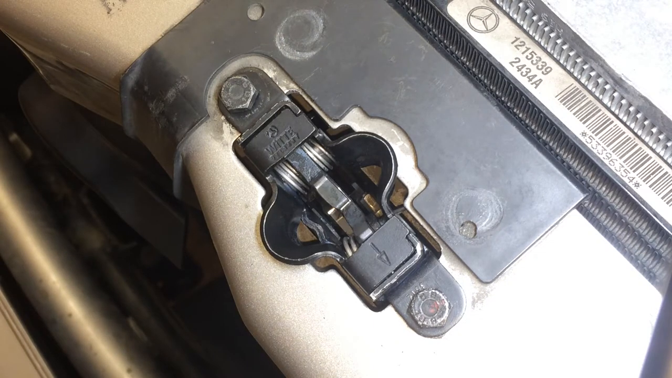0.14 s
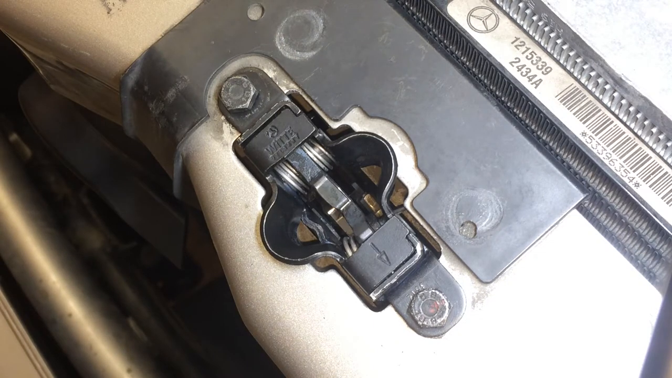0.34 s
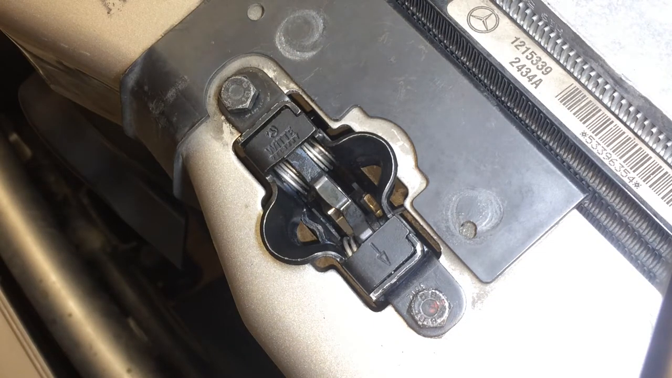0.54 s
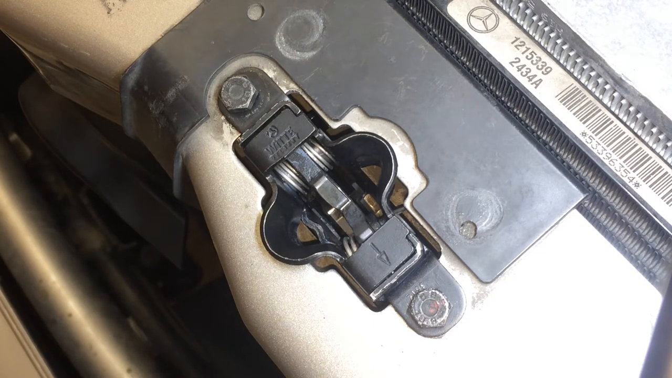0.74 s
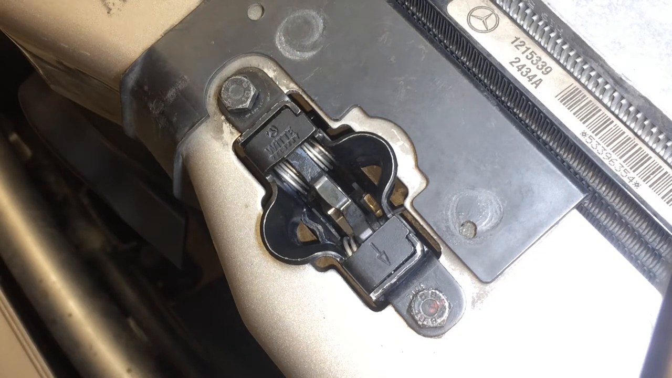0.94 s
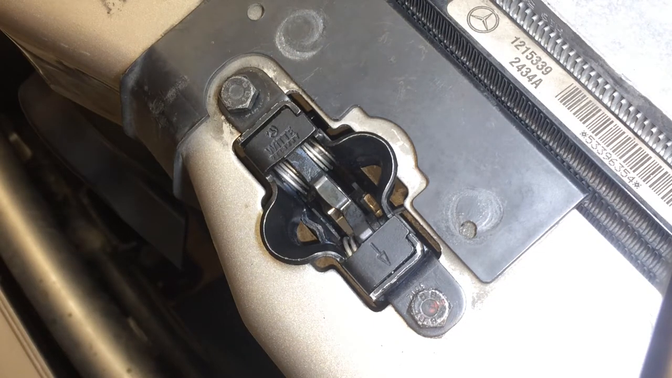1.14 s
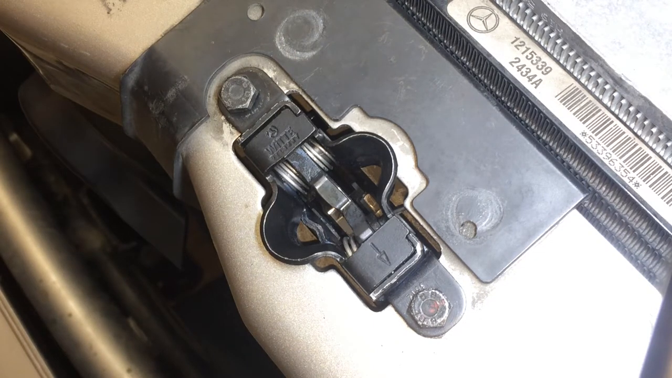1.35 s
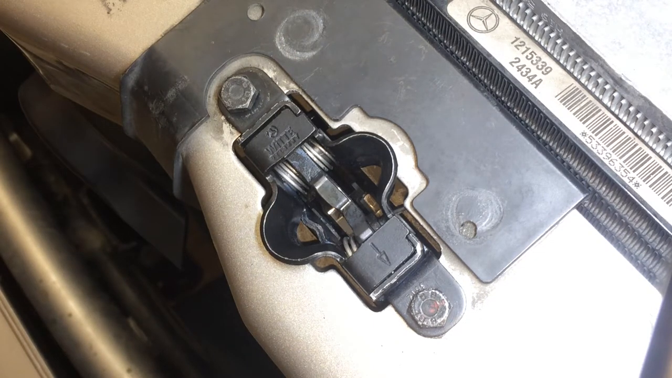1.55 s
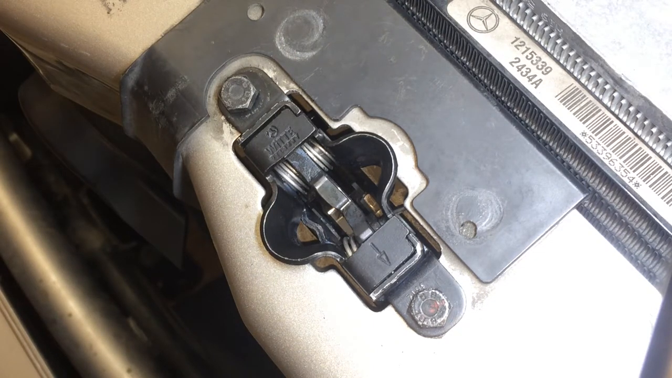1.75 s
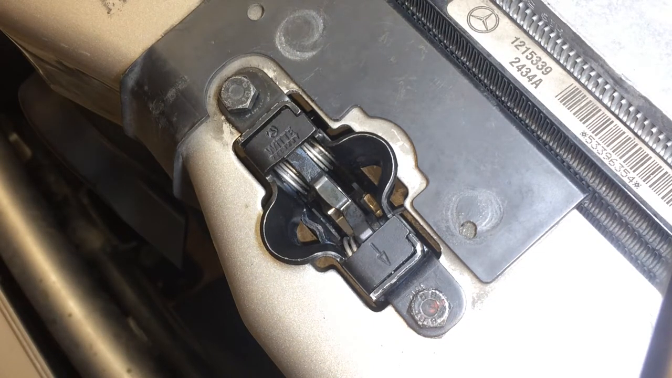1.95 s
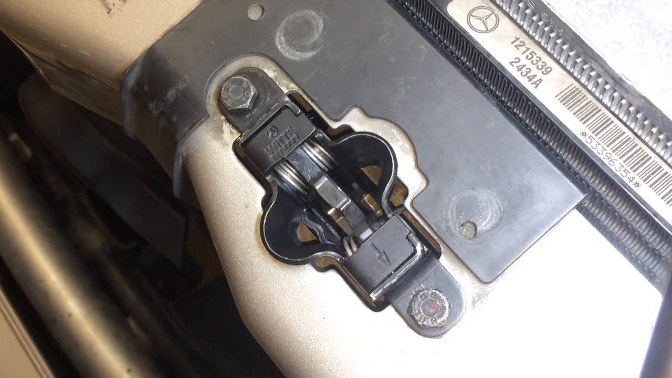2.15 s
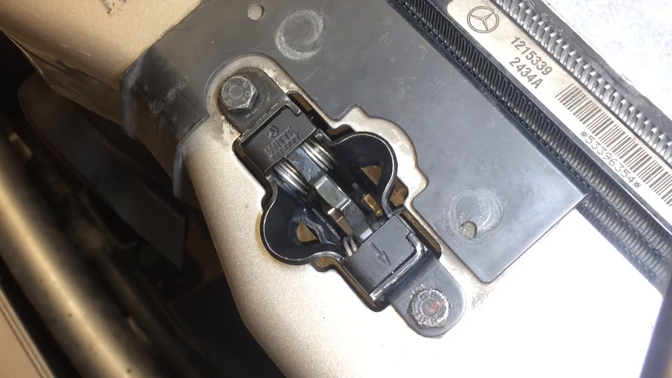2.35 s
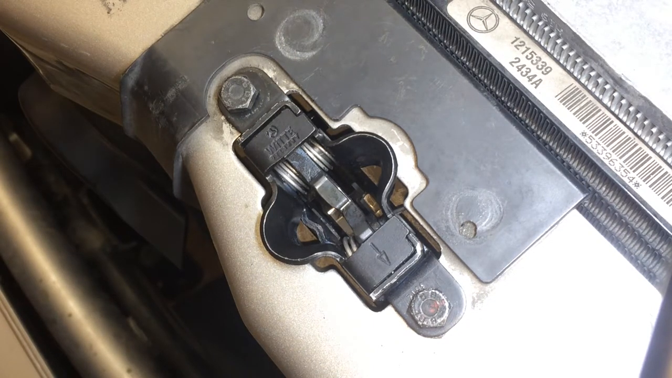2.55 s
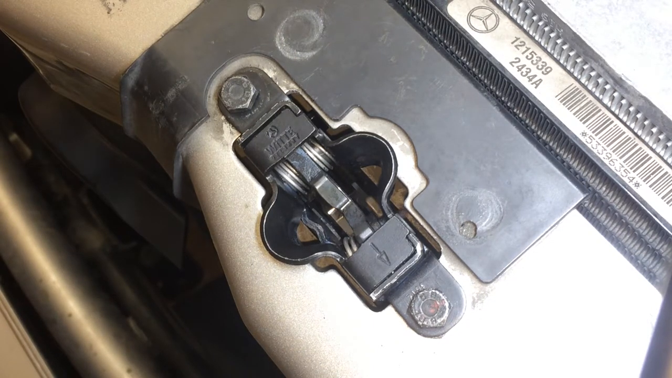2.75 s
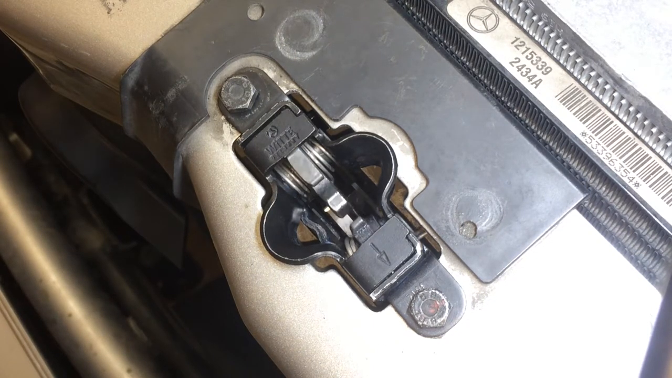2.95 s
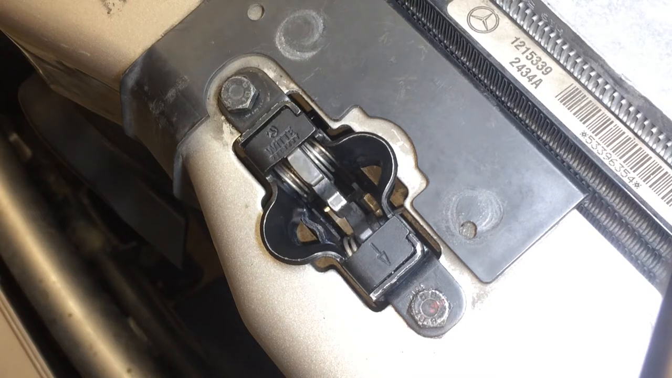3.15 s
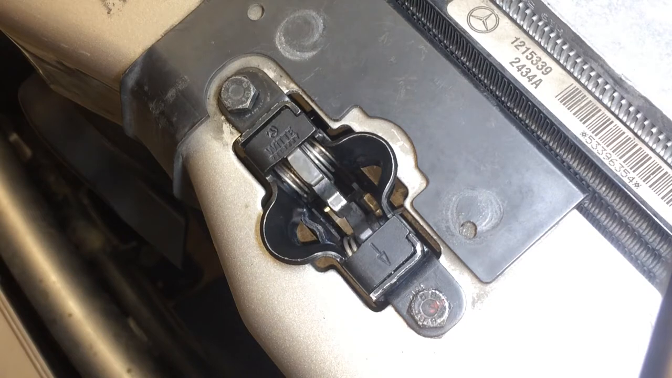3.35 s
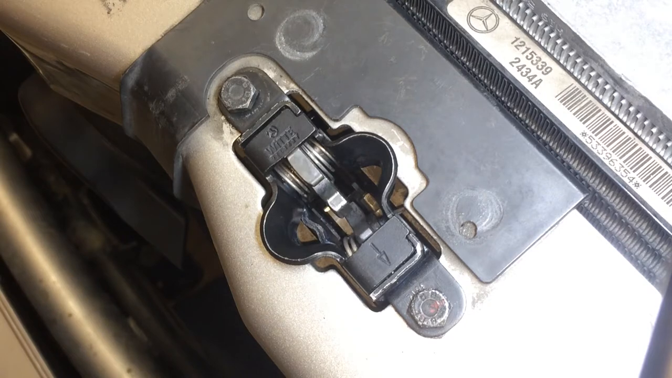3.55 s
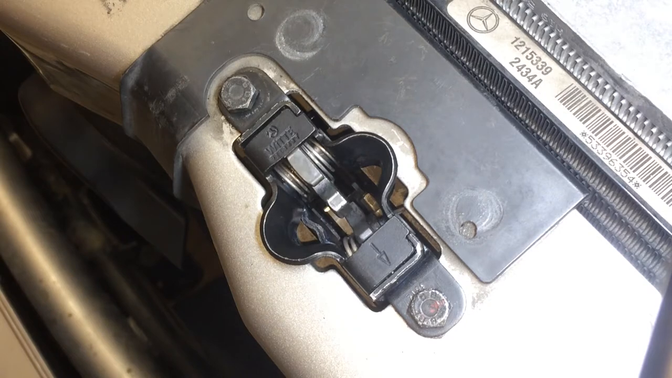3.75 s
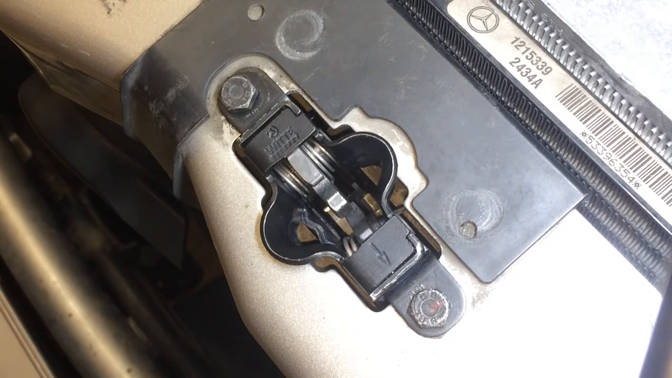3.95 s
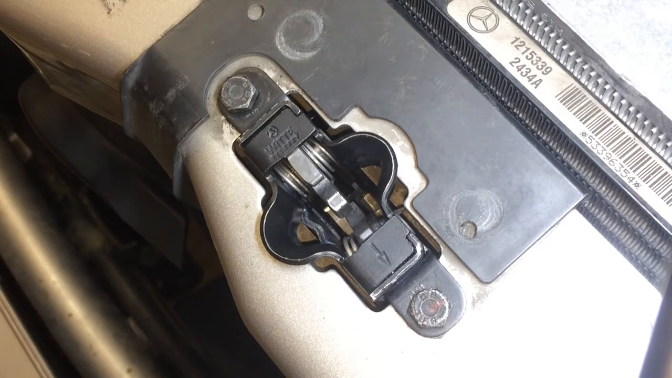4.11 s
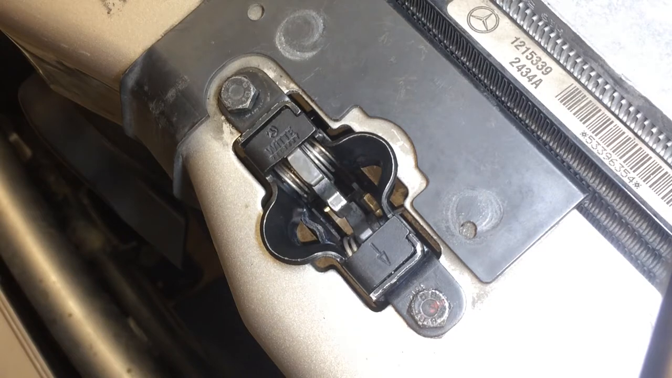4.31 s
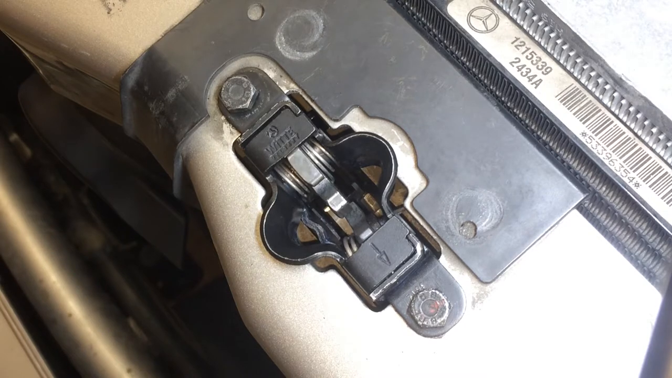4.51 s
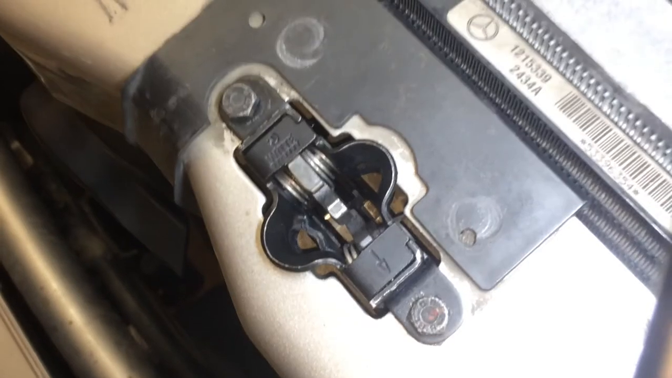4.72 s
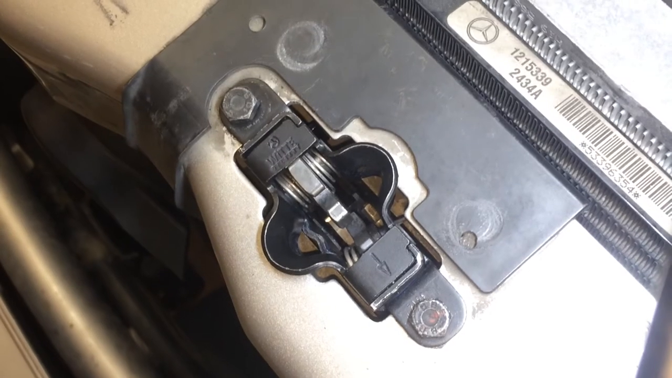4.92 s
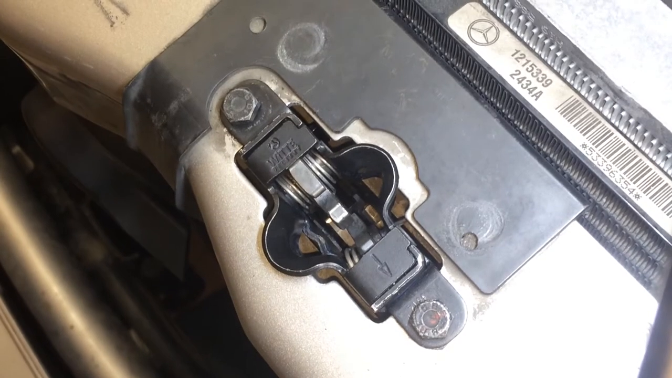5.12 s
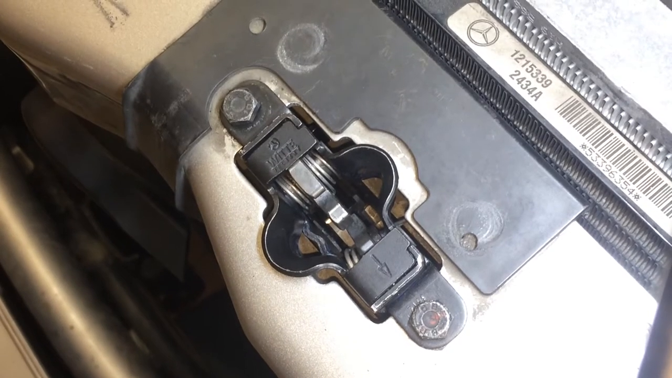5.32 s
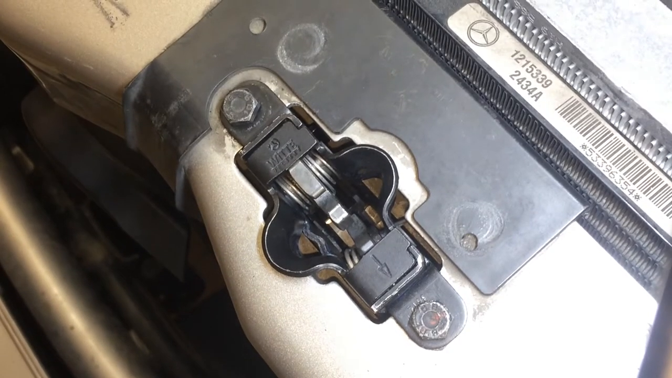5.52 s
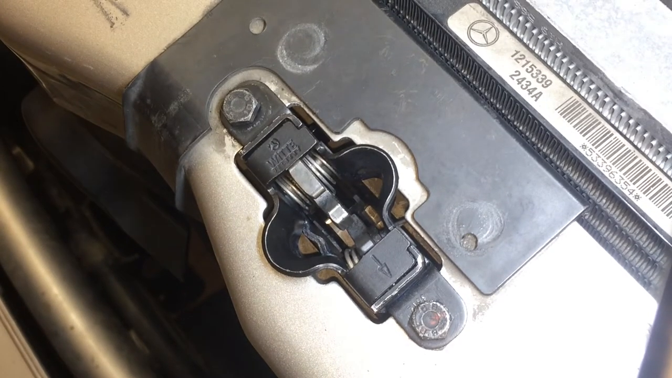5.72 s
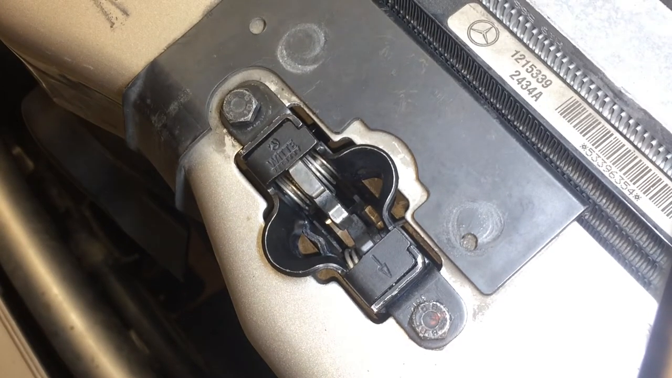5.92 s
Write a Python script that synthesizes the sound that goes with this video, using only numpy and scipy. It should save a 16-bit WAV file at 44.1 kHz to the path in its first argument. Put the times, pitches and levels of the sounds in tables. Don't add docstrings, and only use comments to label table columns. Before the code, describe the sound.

In a hard-walled garage, a low compressor hum runs faintly. Someone scuffs and bumps the car body, with a cluster of hollow knocks around one second. Near three seconds a steel latch snaps free very close, loud and ringing, then clacks back. Later a door shuts with a boomy double thud, loose trim rattles, and a few faint knocks follow. Close phone microphone, echo after every blow.

```python
import sys
import numpy as np
from scipy import signal
from scipy.fft import rfft, irfft, next_fast_len
from scipy.io import wavfile
from scipy.ndimage import uniform_filter1d, map_coordinates

SR = 44100
rng = np.random.default_rng(int(sys.argv[2]) if len(sys.argv) > 2 else 0)


def elevation(decibels):
    levels = np.asarray(decibels, float)
    return 10 ** (levels / 20)


def output_pcm(signal):
    pcm = np.clip(np.atleast_2d(signal).T, -1, 1) * 32767
    wavfile.write(sys.argv[1], SR, np.round(pcm).astype(np.int16))


N = 267775
SPAN = SR

# f/Hz, fall by 60 dB/s
WALLS = [(40, 0.91), (150, 0.43), (400, 0.35), (1500, 0.4), (4000, 0.38), (12000, .27)]
# f/Hz, level/dB, wander/Hz
HUM = [(60.2, -67, 1.3), (118.6, -68, 2.2), (204, -76.5, 5), (405, -78.5, 2.4), (722, -84, 7.1),
       (876, -76, 0.45), (1724, -86, 3)]
# f/Hz, level per Hz/dB
AIR = [(15, -36), (25, -12), (120, -2), (166, -5.5), (317, -10.5), (405, -10.5), (591, -17.5), (796, -18.5),
       (863, -15), (988, -22), (1740, -18.5), (2760, -28), (12900, -33.5), (14800, -37.5), (16000, -48)]
# t/s, clatter level/dB, hardness/dB per octave, boom over clatter/dB, contact/s
BUMPS = [(.208, -57, -2, 14.5, 0.028), (.84, -55.5, -2.5, 6.5, 0.064), (.88, -54, -3.5, 8.5, 0.068),
         (.915, -52.5, -7, 9.5, 0.048), (.947, -37.5, -2, 13, 0.038), (1.311, -29.5, -5, 3, 0.024),
         (1.345, -42.5, -6, 14.5, 0.024), (1.438, -61.5, 3, 15, 0.026), (1.52, -51.5, -11, -8, 0.042),
         (1.76, -61.5, -1.5, 9.5, 0.028), (1.92, -62, 21, 9.5, 0.022), (2.398, -54.5, -9, -7, .05),
         (3.718, -59, -4.5, -2, 0.05), (4.40, -56, -12, 0, 0.06), (5.601, -46, -7, -10, 0.024),
         (5.655, -58, -16, -17, .0097), (5.797, -58, -2.5, -3, 0.015)]
# f/Hz, width/Hz, level/dB
PANEL = [(55, 19.9, -13), (89, 23, -9.5), (130, 38, -2.5), (209, 18, -4), (311.2, 58, -8)]
# f/Hz, level per Hz/dB
BODY = [(150, -20), (300, 3), (800, 1.5), (1500, 0.5), (3000, -4.5), (5000, -5.5), (7000, -9),
        (9000, -13.5), (15000, -12.5)]
# t/s, level/dB, f/Hz, contact/s
BRACKETS = [(.842, -62, 4300, .004), (.876, -64, 3960, .006), (.954, -46, 5070, 0.023),
            (.948, -34, 129, 0.038), (.952, -38, 343, 0.044), (1.033, -39.5, 1300, 0.009),
            (1.315, -33, 304, 0.021), (1.34, -39.5, 212, 0.056), (1.076, -52.5, 1590, .02),
            (1.313, -32.5, 773, .025), (2.84, -58, 2100, .014), (2.87, -37, 2500, .025),
            (2.914, -41.5, 149.8, .03), (4.525, -55, 300, .06), (4.63, -33, 6300, .038),
            (4.632, -30, 3480, .03), (4.685, -26, 130, 0.028), (4.9, -49, 185, .25)]
# t/s, level/dB, f/Hz, contact/s
HANDLES = [
    (.209, -53, 260, 0.023),
    (.95, -40, 510, 0.1),
    (1.44, -53, 2520, 0.012),
    (2.899, -23, 3300, 0.09),
    (3.721, -49, 179, 0.018),
    (4.633, -23.5, 527, 0.039),
    (5.664, -64.5, 3180, .04),
]
# t/s, level/dB, f/Hz, contact/s
COVERS = [
    (.225, -68.5, 4960, 0.096),
    (2.395, -48, 950, .045),
    (3.127, -23, 1044, 0.016),
    (5.602, -45, 900, 0.023),
]
# t/s, level/dB, brightness/dB per octave, stroke/s
SCUFFS = [(0.3094, -60, 0.5, 0.05), (0.3975, -58, -1.5, 0.019), (0.5989, -59, -2, 0.043),
          (0.6498, -68.5, -1, 0.034), (1.246, -51.5, -5, 0.052), (1.7096, -61.5, -1, 0.056),
          (1.9235, -52.5, 2.5, 0.017), (2.076, -55.5, 1.5, 0.056), (4.4992, -66.5, 6.5, 0.054),
          (5.5102, -61.5, -0.5, 0.05), (5.6497, -59.5, 3, 0.028), (5.6794, -64.5, 12, 0.05)]
# f/Hz, level per Hz/dB
SCRAPE = [(300, -10.5), (700, -0.5), (2000, -1), (3000, -2.5), (4500, -5.5), (7000, -7.5), (9000, -11),
          (15000, -18)]
# f/Hz, width/Hz, level/dB
TOOL = [(1700, 60, -3), (2380, 60, -2), (2820, 50, 0.5), (3760, 60, -3), (5830, 52, -4), (6853, 70, -2),
        (7500, 80, -6), (8882, 80, -12)]
# t/s, level/dB, ring over level/dB, crack/s, wall answer/dB
LATCH = [
    (2.839, -59.5, -10.5, 0.0078, 5.5),
    (2.8641, -39.5, -13, 0.0025, 0),
    (2.886, -7, -5, 0.00092, -2),
    (2.899, -12.5, 1.5, 0.0057, -15),
    (3.115, -39.5, -17, 0.0019, -6),
    (3.1209, -13, -8, 0.0022, -16.5),
    (3.125, -19.5, -31, 0.0019, -7),
]
# f/Hz, level/dB, fall by 60 dB/s
STEEL = [(665, -7.5, 0.14), (1373, -8, .1), (1588, -5.5, .12), (1750, -4, 0.08), (1908, -3.5, 0.18),
         (2430, 3, 0.1), (2820, -6, .1), (3364, -4, .12), (3537, -6.5, .12), (3730, -5, .09),
         (4070, -8, 0.086), (5820, -8.5, 0.024), (6780, -10.5, 0.078)]
# f/Hz, level per Hz/dB
CRACK = [(150, -41), (350, -12.5), (650, -7), (1100, -12), (1600, -3.5), (2300, -2.5), (3700, -5.5),
         (6000, -7.5), (8500, -12.5), (14500, -15), (16000, -23.5)]
# t/s, level/dB, width/s
SHOVE = [
    (2.879, -14.5, 0.0031),
    (2.89, -27.5, 0.0082),
]
# t/s, clatter level/dB, hardness/dB per octave, boom over clatter/dB, contact/s
DOOR = [
    (4.603, -33.5, -6, -0.5, 0.053),
    (4.62, -20, -1, 4.5, .035),
    (4.643, -22, -2.5, 5, .025),
    (4.685, -36.5, -3, 15.5, 0.039),
    (4.705, -32.5, -9, 3, 0.019),
    (4.719, -36, 4.5, -5, .003),
    (4.8, -55, -3, 12, 0.36),
]
# f/Hz, width/Hz, level/dB
CABIN = [(49.6, 23, -7), (79, 15, -8), (121.7, 23, -1.5), (189, 73, -9), (300, 49, -10)]
# t/s, level/dB
TRIM = [
    (4.88, -45.5),
    (4.94, -45),
    (4.995, -48.5),
    (5.015, -54),
    (5.055, -52.5),
    (5.105, -55.5),
    (5.18, -67),
]
# f/Hz, width/Hz, level/dB
TRIM_MODES = [(900, 155, 6.5), (1540, 136, -3), (1888, 160, 0)]
# t/s, depth/dB
DUCKS = [
    (2.886, -9.5),
    (4.622, -4),
]


def unit(x):
    return x / np.sqrt(np.mean(x ** 2) + 1e-20)


def loudest(x):
    return x / np.sqrt(np.abs(uniform_filter1d(x ** 2, SR // 100)).max() + 1e-20)


def along(points, hz):
    f, v = np.transpose(points)
    return np.interp(np.log(hz + 1), np.log(f + 1), v)


def wobble(rate, size):
    knots = rng.standard_normal(int(size * rate / SR) + 4)
    return map_coordinates(knots, [np.arange(size) * rate / SR])


def filtered(x, response):
    m = next_fast_len(len(x) + SR // 4)
    return irfft(rfft(x, m) * response(np.fft.rfftfreq(m, 1 / SR)), m)[:len(x)]


def resonances(modes):
    def response(f):
        total = 0
        for k, (hz, width, db) in enumerate(modes):
            total = total + (-1) ** k * elevation(db) * 1j * f * width / (hz * hz - f * f + 1j * f * width)
        return total
    return response


def sloped(points, tilt_db):
    return lambda f: elevation(along(points, f) + tilt_db * np.log2((f + 50) / 3000))


def add(out, s, x):
    out[round(s * SR):][:len(x)] += x


def contact(length, lumps_db):
    u = np.arange(SPAN) / SR / max(length, .001)
    lumps = elevation(lumps_db * wobble(253, size=SPAN))
    return u * np.exp(-u) * lumps * rng.standard_normal(SPAN)


def tail(delay=0.005):
    hz, t, z = signal.stft(rng.standard_normal(SPAN), SR, nperseg=512)
    fade = elevation(-60 * t / along(WALLS, hz)[:, None])
    x = signal.istft(z * fade, SR, nperseg=512)[1][:SPAN]
    x = x * (1 - np.exp(-np.arange(SPAN) / SR / delay))
    return x / np.linalg.norm(x)


def heard(length, lumps_db, wet_db):
    force = contact(length / 3, lumps_db)
    return force + elevation(wet_db) * np.linalg.norm(force) * tail(delay=0.001 + 0.25 * length)


def body_blows(table, panel, wet_db):
    def boom_response(f):
        return resonances(panel)(f) / (1 + 1j * f / 350)

    out = np.zeros(N + SPAN)
    for s, db, tilt_db, boom_db, length in table:
        force = heard(length, lumps_db=3.5, wet_db=wet_db)
        push = heard(length, lumps_db=2.0, wet_db=wet_db - 3.5)
        push[round(.2 * length * SR)] += 0.63 * np.linalg.norm(push)
        boom = loudest(filtered(push, boom_response))
        clatter = loudest(filtered(force, sloped(BODY, tilt_db)))
        add(out, s, elevation(db) * (elevation(boom_db) * boom + clatter))
    return out[:N]


def garage():
    z = signal.stft(rng.standard_normal(N + 512), nperseg=512)[2]
    patches = uniform_filter1d(uniform_filter1d(rng.standard_normal(z.shape), 6, 0), 10, 1)
    noise = signal.istft(z * elevation(0.93 * unit(patches)), nperseg=512)[1][:N]
    out = elevation(-65.5) * unit(filtered(noise, lambda f: elevation(along(AIR, f))))
    for hz, db, wander in HUM:
        level_db = db + 3.5 + np.minimum(wander, 2.5) * wobble(5.2, size=N)
        turns = np.cumsum(hz + wander * wobble(12, size=N)) / SR
        out = out + elevation(level_db) * np.sin(2 * np.pi * turns)
    return out


def body_bumps():
    return body_blows(BUMPS, PANEL, wet_db=3.5)


def knocks(table, spread, wet_db):
    out = np.zeros(N + SPAN)
    for s, db, hz, length in table:
        width = spread * hz
        band = resonances([(hz, width, 0)])
        force = heard(length, lumps_db=2.5, wet_db=wet_db)
        knock = filtered(force, lambda f: band(f) ** 2 / (1 + 1j * f / (hz + 1.2 * width)) ** 2)
        add(out, s, elevation(db) * loudest(knock))
    return out[:N]


def small_parts():
    brackets = knocks(BRACKETS, spread=0.18, wet_db=-4.5)
    handles = knocks(HANDLES, spread=0.54, wet_db=-3)
    covers = knocks(COVERS, spread=1.2, wet_db=-4.5)
    return brackets + handles + covers


def scuffs():
    out = np.zeros(N + SPAN)
    for s, db, tilt_db, length in SCUFFS:
        stroke = heard(length, lumps_db=-7.5, wet_db=13)
        add(out, s, elevation(db - 3.5) * loudest(filtered(stroke, sloped(SCRAPE, tilt_db))))
    return out[:N]


def tool_clink():
    out = np.zeros(N + SPAN)
    shake = heard(0.034, lumps_db=3, wet_db=-5)
    add(out, 1.924, elevation(-53.5) * loudest(filtered(shake, resonances(TOOL))))
    return out[:N]


def steel_ring():
    t = np.arange(SPAN) / SR
    ring = 0
    for hz, db, t60 in STEEL:
        level_db = db + 3.5 * rng.uniform(-1, 1)
        ring = ring + elevation(level_db - 60 * t / t60) * np.sin(2 * np.pi * hz * t)
    return ring


def latch():
    out = np.zeros(N + SPAN)
    for s, db, ring_db, length, wet_db in LATCH:
        tilt_db = 2.16 + .16 * db + .2 * ring_db
        ring = steel_ring()
        crack = filtered(contact(length, lumps_db=4), sloped(CRACK, 0))
        answer = loudest(filtered(tail(), sloped(CRACK, tilt_db)))
        ring_echo = signal.fftconvolve(ring, tail())[:SPAN]
        ring_echo = filtered(ring_echo, sloped([(250, -51.5), (500, -0.5)], tilt_db))
        answer += elevation(ring_db - 2.5) * loudest(ring_echo)
        sound = loudest(crack) + elevation(ring_db) * loudest(ring) + elevation(wet_db) * loudest(answer)
        add(out, s, elevation(db - 5.5) * sound)
    for s, db, width in SHOVE:
        out[:N] -= elevation(db) * np.exp(-np.abs(np.arange(N) / SR - s) / (0.44 * width))
    return filtered(out[:N], lambda f: elevation(-8 * np.exp(-((f - 8610) / 220) ** 2)))


def door_shuts():
    return body_blows(DOOR, CABIN, wet_db=3)


def trim_rattle():
    out = np.zeros(N + SPAN)
    modes = resonances(TRIM_MODES)
    for s, db in TRIM:
        tap = heard(0.03, lumps_db=1.5, wet_db=0)
        rattle = filtered(tap, lambda f: modes(f) / (1 + (f / 2500) ** 4))
        add(out, s, elevation(db - 6.5) * loudest(rattle))
    return out[:N]


def scene():
    mix = garage() + body_bumps() + small_parts() + scuffs() + tool_clink()
    mix = mix + latch() + door_shuts() + trim_rattle()
    return mix[None]


def ducking():
    fall_s, hold_s, recover_s, rest_db = .02, 0.22, 0.32, 0.77
    events = np.array(DUCKS)
    since = np.arange(N) / SR - events[:, :1]
    drop = 1 - np.exp(-np.maximum(since, 0) / fall_s)
    climb = np.clip(1 - (since - hold_s) / recover_s, 0, 1)
    return elevation(rest_db + events[:, 1] @ (drop * climb))


def band_limit(x):
    return signal.sosfilt(signal.butter(12, 16520, fs=SR, output="sos"), x)


def record(dry):
    x = filtered(dry[0], resonances([(736.4, 13000, 0.0066)]))
    x = filtered(x, lambda f: elevation(-30 / (1 + np.exp((15500 - f) / 120))))
    x = x * ducking()
    x = x / (1 + np.abs(x / .72) ** 6) ** (1 / 6)
    return band_limit(x[None])


dry = scene()
out = record(dry)
output_pcm(out)
```